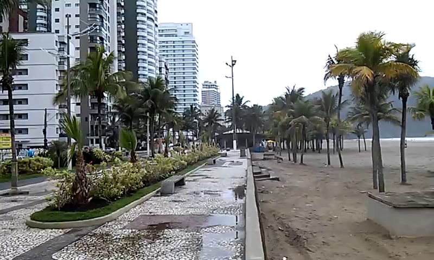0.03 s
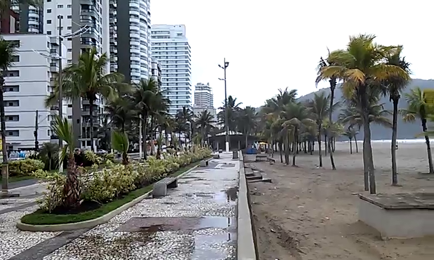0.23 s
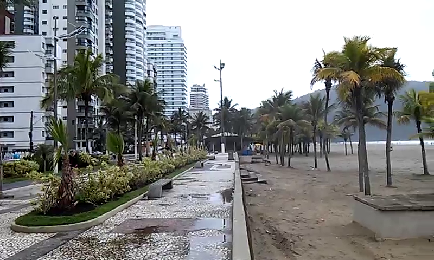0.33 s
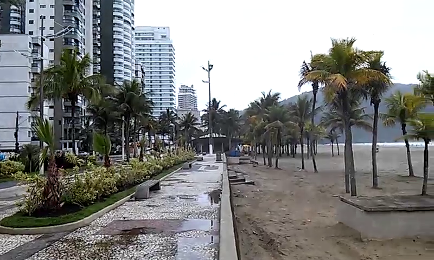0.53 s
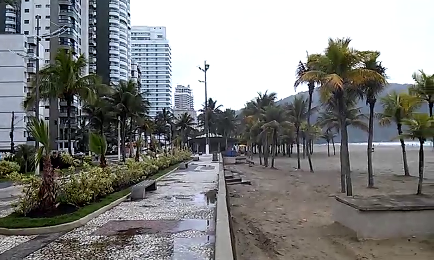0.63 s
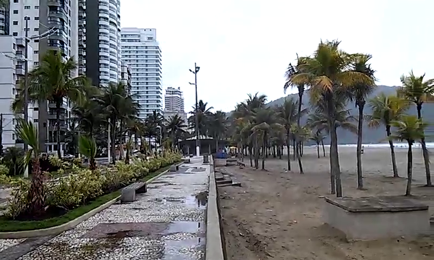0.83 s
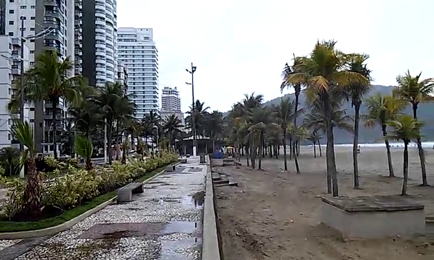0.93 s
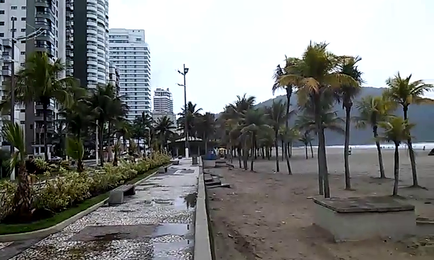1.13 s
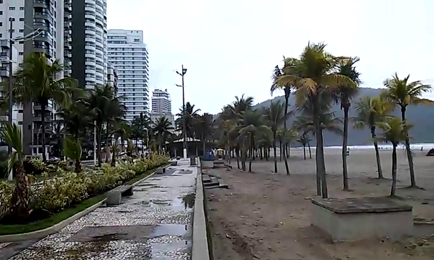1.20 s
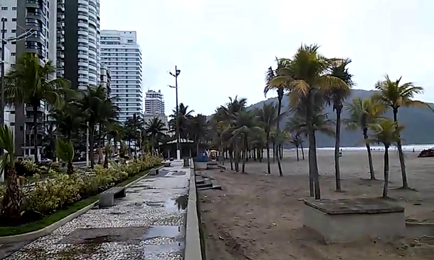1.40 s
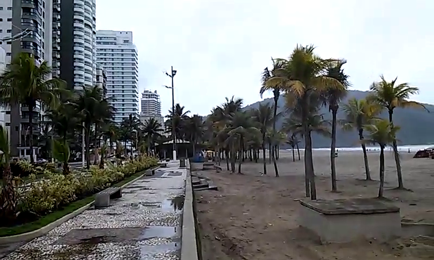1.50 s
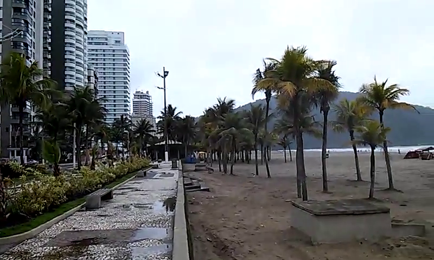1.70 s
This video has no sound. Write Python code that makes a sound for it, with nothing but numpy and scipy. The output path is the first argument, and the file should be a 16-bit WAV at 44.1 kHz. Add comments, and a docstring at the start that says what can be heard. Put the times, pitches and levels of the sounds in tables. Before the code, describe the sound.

Wind thumps on the microphone with a broad rush, then eases into light puffs over the steady wash of far breakers on an open beach. A few tiny close ticks, a thin distant whistle and a faint, high bird chirp follow.

```python
"""A gust thumps on the microphone and rushes past it, then drops to a few weak puffs.
The place is an open beachfront under a grey sky: eddies of wind make the rumble, and far
behind it the breakers merge into one steady wash under the high hiss of the open air.
Small dry ticks sound close by, most of them in the lull, which also uncovers a thin far
whistle, faint hollow swells in the distance and one very high two-part bird chirp."""
import sys
import numpy as np
from scipy import signal
from scipy.io import wavfile
from scipy.ndimage import uniform_filter1d

SR = 44100
rng = np.random.default_rng(int(sys.argv[2]) if len(sys.argv) > 2 else 0)


def digitize_waveform(pressure):
    """Quantize a signal to 16-bit integers and store it at the path in sys.argv[1].

    Rows of a 2-D input are taken as channels; values are limited to [-1, 1].
    """
    field = np.atleast_2d(pressure).T
    bounded = np.clip(field, -1, 1)
    quanta = np.round(bounded * 32767).astype(np.int16)
    wavfile.write(sys.argv[1], SR, quanta)


N = 77175
TIME = np.arange(N) / SR

# wind pressure on the microphone: t/s, level/dB
WIND_PRESSURE = [(.09, -26.5), (.125, -25.5), (.165, -18.5), (.2, -23), (.32, -19), (.41, -19.5),
                 (.53, -22), (.59, -17), (.65, -22.5), (.755, -21.5), (.795, -19), (.87, -22.5),
                 (1.02, -38), (1.088, -43.5), (1.1, -27.5), (1.16, -27.5), (1.26, -33.5), (1.33, -27),
                 (1.38, -35.5), (1.5, -32.5), (1.58, -40), (1.75, -36.5)]
# rumble of weak puffs: f/Hz, relative level/dB per Hz
PUFF_SPECTRUM = [(22, 1), (38, -0.5), (58, 1.5), (105, -0.5), (165, -9.5), (250, -20), (400, -23)]
# rumble of a strong gust: f/Hz, relative level/dB per Hz
GUST_SPECTRUM = [(22, -14), (38, -7.5), (58, 2.5), (100, 2.5), (135, -4.5), (175, -1.5), (250, -14),
                 (400, -23), (800, -42)]
# air rushing past the microphone: f/Hz, relative level/dB per Hz
RUSH_SPECTRUM = [(200, 2.5), (400, 1.5), (800, -3), (1100, -7.5), (1900, -10), (2800, -9), (3600, -15.5),
                 (5300, -17.5), (7500, -31), (10000, -56), (16000, -52)]
# dry ticks close by: t/s, peak level/dB, centre f/Hz, width/Hz, decay/s
NEAR_TICKS = [(0.502, -36, 10750, 7000, .004), (0.507, -42, 10500, 7000, .002),
              (.9838, -31, 7400, 1900, .0006), (0.9944, -33.5, 7700, 1890, .0006),
              (1.003, -32, 6000, 6000, 0.0019), (1.132, -49, 11500, 2500, .003),
              (1.323, -39.5, 9600, 2500, 0.0026), (1.519, -40, 5400, 1200, .001),
              (1.564, -37.5, 6200, 2500, .001)]
# the bird's chirp, down and up again: t/s, f/Hz, level/dB
BIRD_CHIRP = [(1.538, 10600, -60), (1.553, 9700, -48), (1.566, 8630, -48), (1.575, 8160, -49),
              (1.579, 9550, -46), (1.595, 10040, -43), (1.606, 9700, -42.5), (1.611, 9800, -56)]
# a whistle far off: t/s, f/Hz, level/dB
FAR_WHISTLE = [(1.28, 2870, -58), (1.315, 2850, -50.5), (1.35, 2850, -56.5), (1.38, 2820, -45),
               (1.42, 2820, -69)]
# hollow swells in the distance: t/s, length/s, f/Hz, level/dB
HOLLOW_SWELLS = [(1.427, 0.068, 351, -42), (1.652, 0.066, 359, -43), (1.649, 0.049, 621.4, -40.5),
                 (1.689, 0.055, 772, -45)]
# wash of the distant surf: f/Hz, relative level/dB per Hz
SURF_SPECTRUM = [(100, 1), (170, -2), (330, 2), (520, -4.5), (850, -4.5), (1200, -11.5), (2100, -12.5),
                 (2900, -15.5), (3800, -29.5), (6000, -31)]
# swell of that wash: t/s, level/dB
SURF_LEVEL = [(.09, -41.5), (1.0, -39), (1.07, -42.5), (1.2, -40.5), (1.35, -40), (1.52, -39),
              (1.64, -42.5), (1.75, -43)]
# high hiss of the open air: f/Hz, relative level/dB per Hz
HISS_SPECTRUM = [(2500, -2), (3800, 1), (5500, -0.5), (7800, 4), (9500, -12.5), (12500, -8.5), (16000, -15)]
# level of that hiss: t/s, level/dB
HISS_LEVEL = [(.09, -56), (1.1, -53), (1.4, -53.5), (1.6, -53.5), (1.7, -56)]


def buffeting(weak_db=-29.5, strong_db=-21.5, even_s=0.039):
    """Eddies thump on the microphone; the wind pressure sets their strength and speed."""
    db, = in_time(WIND_PRESSURE)
    gust_share = np.clip((db - weak_db) / (strong_db - weak_db), 0, 1)
    puffs = banded_noise(PUFF_SPECTRUM, flicker_db=2.5, flicker_hz=17.4)
    gust = banded_noise(GUST_SPECTRUM, flicker_db=2.0, flicker_hz=26)
    eddies = np.sqrt(1 - gust_share) * puffs + np.sqrt(gust_share) * gust
    # even out chance swings, so that the level follows the pressure
    local_power = uniform_filter1d(eddies ** 2, int(even_s * SR) + 1)
    return from_db(db) * eddies / np.sqrt(local_power + 1e-6)


def rush(top_db=-30.5, top_s=0.78, rise_db_per_s=1, fall_db_per_s=77, flutter_db=0.36):
    """The gust streams past the microphone: a broad, fluttering hiss that holds, then dies away."""
    before, after = np.maximum(top_s - TIME, 0), np.maximum(TIME - top_s, 0)
    db = top_db - rise_db_per_s * before - fall_db_per_s * after + flutter_db * drift(40)
    return from_db(db) * banded_noise(RUSH_SPECTRUM, flicker_db=0.2, flicker_hz=5)


def ticks(attack_s=0.00037):
    """Close to the microphone, each dry tick is a tiny burst of noise in one band."""
    out = np.zeros(N)
    for start, db, hz, width, decay in NEAR_TICKS:
        age = np.maximum(TIME - start, 0)
        tick = band_noise(hz, width) * (1 - np.exp(-age / attack_s)) * np.exp(-age / decay)
        out += from_db(db) * tick / np.abs(tick).max()
    return out


def bird():
    """One very high chirp, more narrow noise than pure tone."""
    return whistled_note(BIRD_CHIRP, rough=0.93, width_hz=420)


def whistle():
    """A thin, breathy note from far off that swells twice."""
    return whistled_note(FAR_WHISTLE, rough=0.75, width_hz=170)


def hollows():
    """Narrow bands of the far background rise and sink."""
    out = np.zeros(N)
    for start, length, hz, db in HOLLOW_SWELLS:
        arch = np.sin(np.pi * np.clip((TIME - start) / length, 0, 1))
        out += from_db(db) * arch * rough_tone(hz, rough=0.94, width_hz=39)
    return out


def surf():
    """Far down the beach the breakers merge into one slowly swelling wash."""
    db, = in_time(SURF_LEVEL)
    return from_db(db) * banded_noise(SURF_SPECTRUM, flicker_db=2.5, flicker_hz=10.7)


def open_air():
    """A faint, steady high hiss lies behind everything."""
    db, = in_time(HISS_LEVEL)
    return from_db(db) * banded_noise(HISS_SPECTRUM, flicker_db=1.4, flicker_hz=10)


def whistled_note(curve, rough, width_hz):
    """A rough tone that follows a curve of pitch and level."""
    hz, db = in_time(curve)
    sounding = (TIME > curve[0][0]) & (TIME < curve[-1][0])
    return from_db(db) * sounding * rough_tone(hz, rough, width_hz)


def rough_tone(hz, rough, width_hz):
    """A tone, partly smeared into noise reaching width_hz to each side; rough runs from 0 to 1."""
    phase = 2 * np.pi * np.cumsum(hz * np.ones(N)) / SR
    lowpass = signal.butter(3, width_hz, fs=SR, output="sos")
    a, b = rms_one(signal.sosfilt(lowpass, rng.standard_normal((2, N))))
    smear = a * np.sin(phase) + b * np.cos(phase)
    return np.sqrt(2 * (1 - rough ** 2)) * np.sin(phase) + rough * smear


def banded_noise(spectrum, flicker_db, flicker_hz):
    """Third-octave bands of noise, each flickering by itself; rms 1."""
    hz, db = np.transpose(spectrum)
    edges = 18 * 2 ** np.arange(0, 10.1, 1 / 3)
    white = rng.standard_normal((2, 2 * N))  # neighbouring bands take different noise
    out = np.zeros(N)
    for k, (low, high) in enumerate(zip(edges, edges[1:])):
        centre = np.sqrt(low * high)
        flicker = flicker_db * drift(flicker_hz)
        if hz[0] / 2 < centre < hz[-1] * 2:
            bandpass = signal.butter(2, [low, high], "band", fs=SR, output="sos")
            band_db = np.interp(np.log(centre), np.log(hz), db)
            out += from_db(band_db + flicker) * signal.sosfilt(bandpass, white[k % 2])[N:]
    return rms_one(out)


def band_noise(hz, width_hz):
    """Noise in one band; rms 1."""
    edges = np.clip([hz - width_hz / 2, hz + width_hz / 2], 10, .45 * SR)
    bandpass = signal.butter(2, edges, "band", fs=SR, output="sos")
    return rms_one(signal.sosfilt(bandpass, rng.standard_normal(N)))


def drift(rate_hz):
    """A smooth random wander; rms 1."""
    pole = np.exp(-2 * np.pi * rate_hz / SR)
    return rms_one(signal.lfilter([1], [1, -2 * pole, pole * pole], rng.standard_normal(2 * N))[N:])


def in_time(rows):
    """Each column of a curve, at every sample."""
    times, *columns = np.transpose(rows)
    return [np.interp(TIME, times, column) for column in columns]


def from_db(db):
    """Decibels to gain."""
    return 10 ** (np.asarray(db) / 20)


def rms_one(x):
    """Scale to unit power."""
    return x / np.sqrt(np.mean(x ** 2) + 1e-20)


def scene():
    """One microphone on the beachfront: wind right on it, small sounds and surf behind."""
    calls = bird() + whistle()
    return (buffeting() + rush() + surf() + open_air() + hollows() + ticks() + calls)[None]


def record(dry, start_s=0.092, cutoff_hz=15750):
    """The microphone's sound cuts in abruptly, with the highest treble cut off."""
    lowpass = signal.ellip(10, .1, 80, cutoff_hz, fs=SR, output="sos")
    opening = np.clip((TIME - start_s) / .0005, 0, 1)
    return signal.sosfilt(lowpass, dry * opening)


dry = scene()
out = record(dry)
digitize_waveform(out)
```